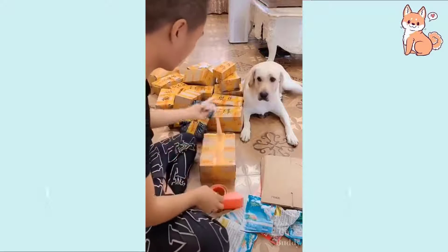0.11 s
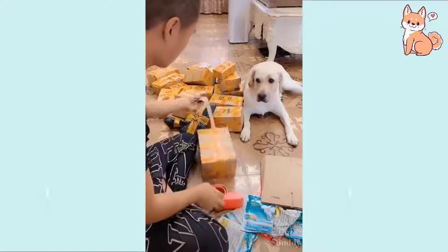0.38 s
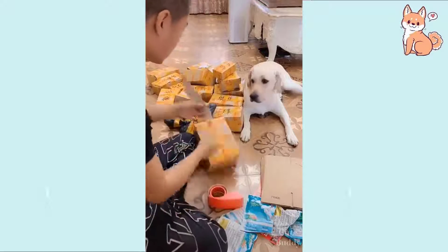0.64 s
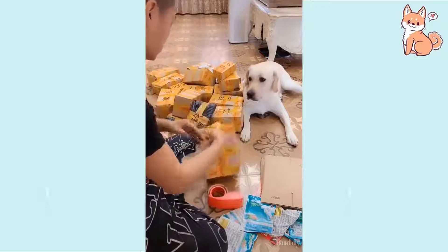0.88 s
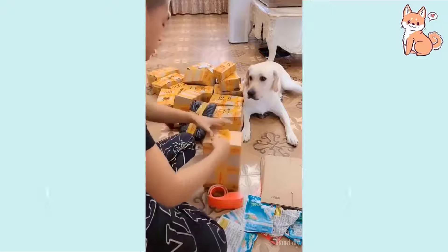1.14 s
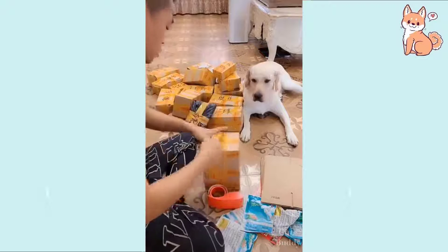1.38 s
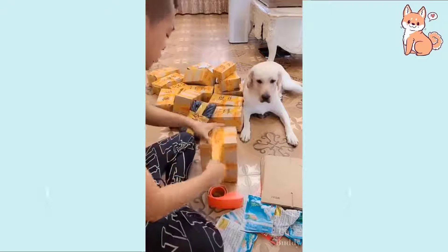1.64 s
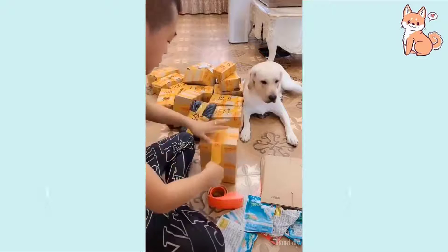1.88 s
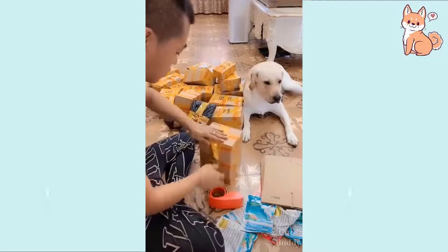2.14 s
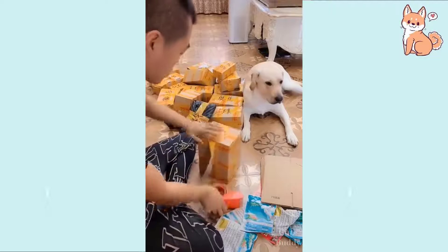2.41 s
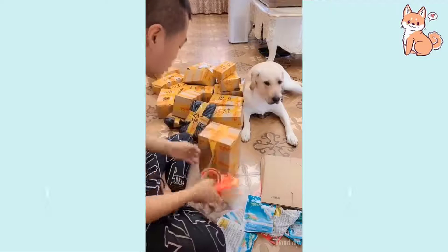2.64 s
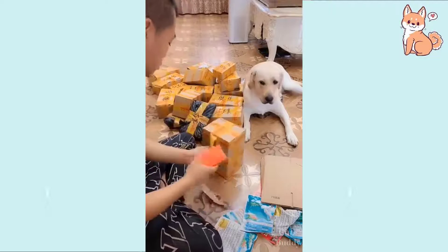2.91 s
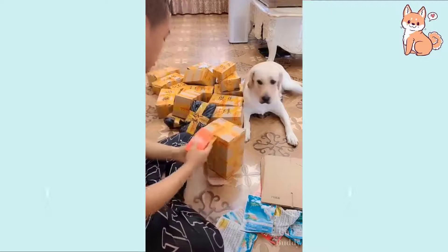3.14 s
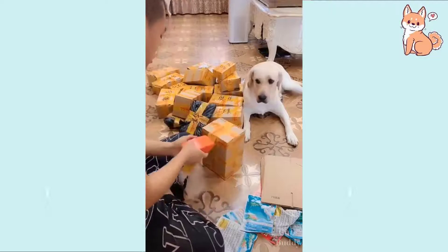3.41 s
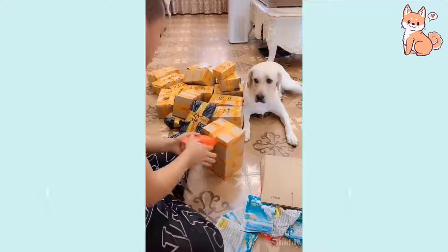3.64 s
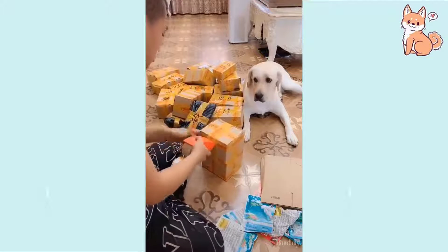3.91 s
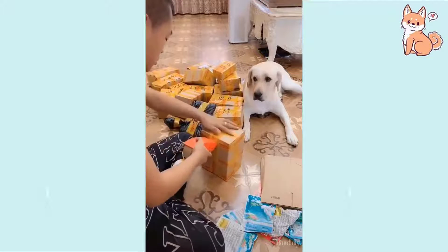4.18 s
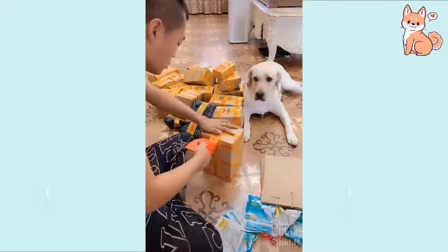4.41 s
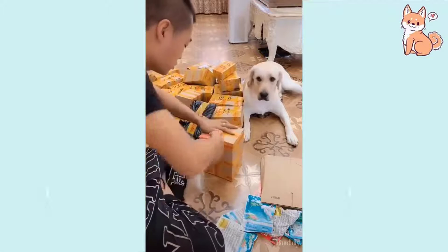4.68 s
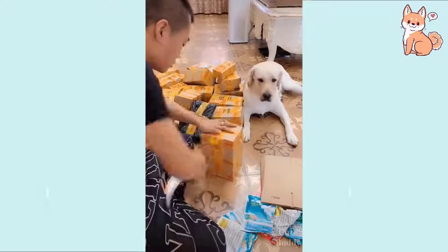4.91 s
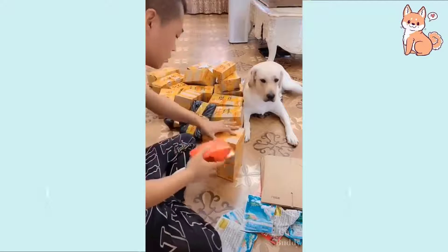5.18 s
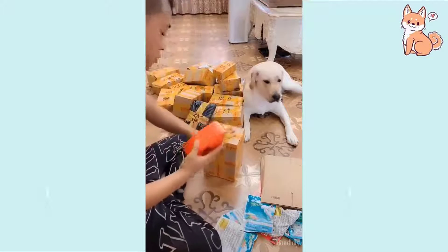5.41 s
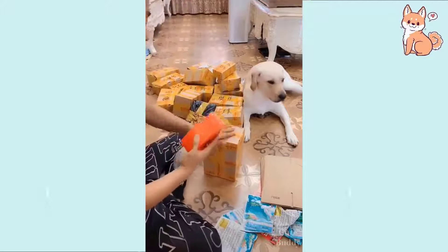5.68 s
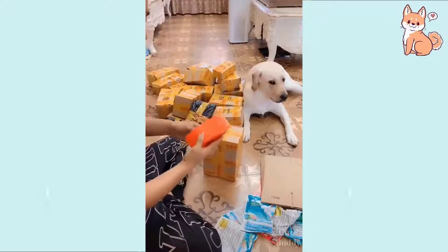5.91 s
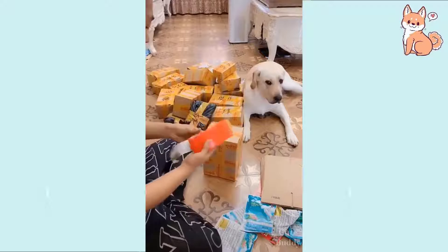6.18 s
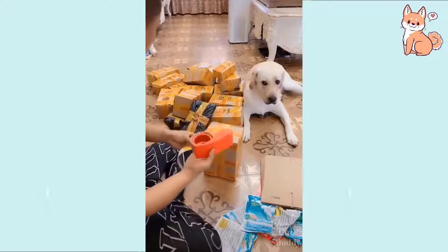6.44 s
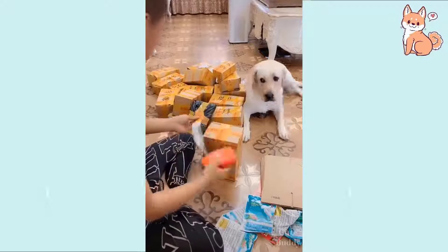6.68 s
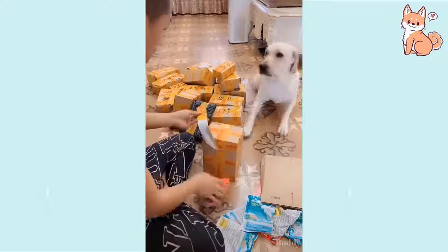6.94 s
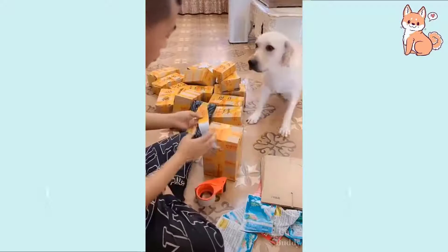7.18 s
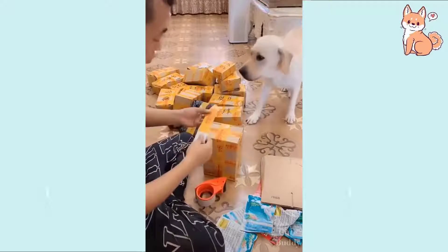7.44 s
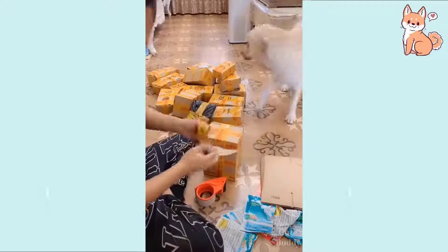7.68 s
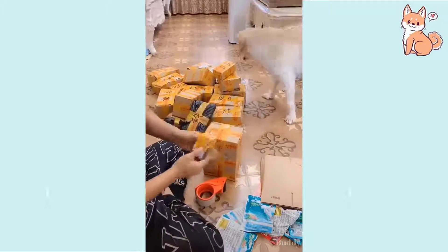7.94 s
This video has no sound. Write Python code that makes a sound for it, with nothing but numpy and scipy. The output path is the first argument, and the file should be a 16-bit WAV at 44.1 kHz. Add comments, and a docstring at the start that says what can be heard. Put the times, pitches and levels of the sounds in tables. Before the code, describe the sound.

Palms pat and knock a carton shut as a plastic tape dispenser clatters and short bursts of sticky tape snap, close up indoors.

```python
"""On a tiled floor indoors, cardboard boxes are taped shut by hand. Palms thump the hollow carton and the
plastic dispenser rattles, is slammed onto the box and is dropped: each blow rings a set of modes under a noisy
crack. Tape snaps as puffs of noise; ripping tape and rubbing hands are trains of tiny slips that shake carton
and dispenser. Film and sleeves rustle as clumps of short rings. The room answers with dying noise over a low
rumble. A phone flattens the loudest peaks."""
import sys
import numpy as np
from scipy import signal
from scipy.fft import rfft, irfft
from scipy.io import wavfile
from scipy.ndimage import uniform_filter1d

SR = 44100
rng = np.random.default_rng(int(sys.argv[2]) if len(sys.argv) > 2 else 0)


def inscribe(sig):
    """Save sig as 16-bit PCM at rate SR to the path in sys.argv[1].

    A 1-D sig is mono; a 2-D sig holds one channel per row.
    Samples are clipped to [-1, 1] before scaling.
    """
    pcm = np.round(np.clip(np.atleast_2d(sig).T, -1, 1) * 32767)
    wavfile.write(sys.argv[1], SR, pcm.astype(np.int16))


def elevation(decibels):
    """Turn decibel levels (scalar or array-like) into linear amplitude ratios."""
    levels = np.asarray(decibels, float)
    return 10 ** (levels / 20)


N = 355887   # length in samples
TIME = np.arange(N) / SR   # seconds


def rms_one(x):
    """Scales a sound to an rms of 1."""
    return x / np.sqrt(np.mean(x ** 2) + 1e-20)


def at_hz(points, hz):
    """Reads a curve of (Hz, value) points, with straight lines over log frequency."""
    points = np.array(points)
    return np.interp(np.log(hz + 1), np.log(points[:, 0]), points[:, 1])


def coloured(x, spectrum):
    """Boosts or cuts each frequency by a curve of (Hz, dB); rms 1."""
    size = x.shape[-1]
    gain = elevation(at_hz(spectrum, np.fft.rfftfreq(size, 1 / SR)))
    return rms_one(irfft(rfft(x) * gain, size))


def ring(x, hz, t60):
    """A resonance: a unit click sets a sine of height 1 ringing, 60 dB down after t60 seconds."""
    r, w = elevation(-60 / (t60 * SR)), 2 * np.pi * hz / SR
    return signal.lfilter([0, np.sin(w)], [1, -2 * r * np.cos(w), r * r], x + 1e-18)


def grains(per_s, spread_db, clump_db):
    """Random clicks of very uneven size, in clumps some 30 ms long; rms 1."""
    slow = signal.lfilter([1], [1, -2 * .997, .997 ** 2], rng.standard_normal(N))
    uneven_db = spread_db * np.minimum(rng.exponential(1, N), 4)
    sizes = elevation(uneven_db + clump_db * np.minimum(rms_one(slow), 2))
    clicks = rng.choice([-1, 1], N) * (rng.random(N) < per_s / SR)
    return rms_one(sizes * clicks)


def add(out, s, sound):
    """Mixes a sound in at s seconds, cut off at the end of the scene."""
    at = round(s * SR)
    out[at:at + len(sound)] += sound[:max(N - at, 0)]


def under(levels, layers):
    """Each layer follows its own dB column, with straight lines between the rows."""
    s, *levels_db = np.transpose(levels)
    return sum(layer * elevation(np.interp(TIME, s, db, left=-150, right=-150))
               for layer, db in zip(layers, levels_db))


HEAD_T60_S, TAIL_DB = 0.081, -3.5   # dying time of the first crack; start level of the crackle behind it
DENT_DB = 1   # depth of the chance resonances


def burst(size, t60, spectrum):
    """A short crack with chance resonances, then a plainer dying crackle; peak 1."""
    dents = [(hz, DENT_DB * np.tanh(chance))
             for hz, chance in zip(np.geomspace(300, 14000, 40), rng.standard_normal(40))]
    uneven = np.repeat(elevation(rng.normal(0, 1.93, size // 128)), 128)   # a new level every 3 ms
    crackle = coloured(rng.standard_normal(size) * uneven, spectrum)
    t = TIME[:size]
    head = coloured(crackle, dents) * elevation(-60 * t / HEAD_T60_S)
    puff = head + crackle * elevation(TAIL_DB - 60 * t / t60)
    return puff / np.abs(puff).max()


DETUNE = 0.016   # the grip shifts each mode a little, as a share of its pitch
CHATTER_DB, CHATTER_T60_S = -3.5, 0.19   # after a blow the loose parts touch again


def blows(events, modes, panel_t60, contact_s, crack, crack_t60):
    """The struck panel rings as a tight cluster and drives nearby modes; a crack and chatter join in."""
    out, t = np.zeros(N), TIME[:16384]
    swell = 1 - np.exp(-(t / contact_s) ** 2)   # the contact builds over a few ms
    for s, peak_db, struck_hz, octaves, crack_db in events:
        # the panel's own cluster is weaker for a broad blow
        panel = [(struck_hz * split, 5.0 - 11 * octaves, panel_t60) for split in (.96, 1, 1.05)]
        hz, level_db, t60 = np.array(modes + panel).T[:, :, None]
        hz = hz * (1 + DETUNE * rng.standard_normal(hz.shape))
        # modes far from the struck pitch get less, those below it less still
        near_db = -6 * np.abs(np.log2(hz / struck_hz)) / max(octaves, .1)
        near_db = near_db - 1.8 * np.maximum(np.log2(struck_hz / hz), 0)
        near_db = np.maximum(near_db, -26.0)   # a little reaches every mode
        phase = rng.normal(0, 0.82, hz.shape)
        # loose panels flutter
        rattle_db = 5.2 * signal.resample(rng.standard_normal((len(hz), 64)), len(t), axis=1)
        height = elevation(level_db + near_db + rattle_db - 60 * t / t60)
        body = swell * np.sum(height * np.sin(2 * np.pi * hz * t + phase), axis=0)
        body = elevation(peak_db) * body / np.abs(body).max()
        add(out, s, body + elevation(crack_db) * swell * burst(len(t), crack_t60, crack))
        touches_s = np.cumsum(rng.uniform(.006, 0.036, 8))
        for late_s, chance in zip(touches_s, rng.uniform(-1.2, 1, 8)):
            add(out, s + late_s, chance * elevation(CHATTER_DB - 60 * late_s / CHATTER_T60_S) * body)
    return out


# Palms hitting the carton; at 5.02 s the dispenser is slammed onto it. Each row: start in seconds, peak of the
# ringing in dB, pitch struck hardest # in Hz, spread over the modes in octaves, crack level in dB.
CARTON_THUMPS = [(0.177, -32.5, 318, 0.15, -52), (0.259, -39, 400, 0.18, -64),
                 (0.68, -27.5, 238, 0.42, -49), (0.867, -22.5, 245, 0.47, -28),
                 (0.982, -6.5, 412.4, 0.85, -17.5), (1.23, -25, 245, 0.24, -40),
                 (1.512, -19.5, 516, 0.44, -53), (2.05, -40, 470, 0.29, -62),
                 (2.145, -38.5, 417, 0.21, -62), (2.215, -24, 408, 0.45, -32),
                 (2.2245, -4, 334.6, 0.51, -14.5), (2.482, -26.5, 488, 0.4, -30),
                 (2.677, -30.5, 495, 0.15, -38), (2.708, -29.5, 228, 0.35, -35),
                 (2.974, -23.5, 205, 0.92, -29), (3.479, -34, 433, 0.19, -32.5),
                 (3.809, -12, 469, 0.55, -27.5), (4.174, -35, 440, 1.2, -32),
                 (4.205, -24.5, 446, 0.61, -35), (4.325, -18.5, 527, 0.31, -58),
                 (4.431, -19.5, 292, 0.5, -29), (4.976, -34, 693, 0.33, -35.5), (5.02, -4, 477, 0.43, -21),
                 (5.306, -39, 375, 0.45, -69), (5.345, -32.5, 443, 0.34, -67),
                 (5.934, -36.5, 442, 0.41, -60), (6.008, -31, 167, 0.56, -65)]
# Ways the hollow carton rings. Each row: pitch in Hz, relative level in dB, dying time when struck in
# seconds (to 60 dB down).
CARTON_MODES = [(77.7, 14.5, 0.19), (168.3, -2.5, 0.38), (205, 17.5, 0.025), (245, -4, 0.17),
                (305.7, -1, 0.17), (414.3, 3.5, 0.17), (471.2, 4, 0.11), (595, -11.5, 0.068),
                (903, -3, 0.22), (1100, 17.5, 0.029), (1592, 17.5, 0.042)]
# Colour of the carton's crack. Each row: frequency in Hz, relative level in dB.
CARTON_CRACK = [(150, -38), (700, 24), (1600, 19), (3000, 8.5), (6000, -2), (13000, -16)]


def carton_thumps():
    """A palm, or the slammed dispenser, sets the hollow box ringing low, with a dense crack of cardboard on
    top."""
    return blows(CARTON_THUMPS, CARTON_MODES, 0.15, 0.0012, CARTON_CRACK, 0.3)


# Harder knocks of the dispenser. Each row: start in seconds, peak of the ringing in dB, pitch struck
# hardest in Hz, spread over the modes in octaves, crack level in dB.
DISPENSER_KNOCKS = [(0.011, -4, 708, 0.66, -12), (2.599, -15.5, 740, 2.8, -36),
                    (3.403, -29, 1740, 0.27, -29.5), (3.439, -32, 1186, 0.18, -38),
                    (3.454, -26, 1750, 0.31, -31), (3.495, -28, 1176, 0.33, -24.5),
                    (3.522, -18, 1540, 0.52, -22.5), (3.572, -29, 1666, 0.35, -30.5),
                    (5.019, -11.5, 1460, 0.51, -10), (5.142, -23, 3000, 1.5, -26),
                    (5.589, -34, 1850, 0.56, -36), (6.214, -26, 1368, 0.42, -33),
                    (6.895, -29, 1626, 0.58, -29), (7.038, -36, 496, 1.4, -36),
                    (7.0815, -6.5, 1750, 1.56, -6), (7.2565, -3, 1297, 2.9, -7),
                    (7.339, -15.5, 1750, 1.2, -30)]
# Light ticks of its loose parts. Each row: start in seconds, peak of the ringing in dB, pitch struck
# hardest in Hz.
DISPENSER_TICKS = [(2.52, -31, 1450), (2.713, -41.5, 1750), (2.839, -42, 1570), (3.116, -35, 1460),
                   (3.31, -31.5, 2055), (3.705, -36, 1390), (3.89, -41, 3250), (3.961, -34, 1300),
                   (4.678, -38, 1345), (5.493, -42, 1415), (6.415, -40.5, 1130), (6.608, -37.5, 1430),
                   (6.705, -36.5, 1480), (6.83, -34, 1680), (7.48, -34, 1000)]
TICK_OCTAVES, TICK_CRACK_DB = 0.47, -5.5   # spread over the modes; crack against the ringing
# Ways the hard plastic rings. Each row: pitch in Hz, relative level in dB, dying time when struck in
# seconds (to 60 dB down).
DISPENSER_MODES = [(564, 5, 0.05), (705, 6, 0.026), (924.5, -5.5, 0.084), (1186, 5, 0.038),
                   (1257.5, -1.5, 0.049), (1465, -3.5, 0.07), (1613, -9.5, 0.15), (1750, -5.5, 0.069),
                   (1901, -7.5, 0.094), (2097, -9, 0.089), (2620, -9, 0.01), (3044, -0.5, 0.029),
                   (4080, -13, 0.04)]
# Colour of the dispenser's clatter. Each row: frequency in Hz, relative level in dB.
DISPENSER_CRACK = [(150, -29), (900, -32), (2500, -12.5), (4000, -16.5), (6500, -19.5), (13000, -33.5)]


def dispenser_knocks():
    """Small stiff plastic rings higher and dies sooner than the box."""
    ticks = [(s, db, hz, TICK_OCTAVES, db + TICK_CRACK_DB) for s, db, hz in DISPENSER_TICKS]
    return blows(DISPENSER_KNOCKS + ticks, DISPENSER_MODES, 0.053, 0.0023, DISPENSER_CRACK, 0.2)


# Sticky tape letting go in single snaps; the last row, at 8.05 s, is a light knock of the dispenser heard as a
# bright puff. Each row: start in seconds, peak in dB, centre pitch in Hz.
TAPE_SNAPS = [(0.343, -38, 3420), (0.357, -28, 4900), (1.392, -40.5, 5700), (2.004, -35, 3250),
              (2.101, -36.5, 3300), (2.359, -35, 3100), (3.184, -41, 4840), (3.227, -32, 3570),
              (3.972, -39.5, 6900), (4.22, -39.5, 7460), (4.8835, -44.5, 5840), (4.913, -39.5, 2620),
              (7.502, -34.5, 3080), (7.548, -27, 3550), (7.946, -25.5, 3300), (8.053, -27.5, 2960)]


def tape_snaps():
    """Each snap is a puff of noise around a broad resonance of the stretched film."""
    out = np.zeros(N)
    for s, peak_db, hz in TAPE_SNAPS:
        film = [(hz / 4, -13), (hz, 0), (hz * 4, -20)]
        add(out, s, elevation(peak_db) * burst(4096, 0.32, film))
    return out


def shaken(slips):
    """Stick-slip grains shake the carton into a drone and the dispenser into a buzz; rms 1 each."""
    # a held thing is damped, so its modes die sooner than when struck
    drone = sum(elevation(db) * ring(slips, hz, 0.75 * t60) for hz, db, t60 in CARTON_MODES[2:8])
    buzz = sum(elevation(db) * ring(slips, hz, 0.15 * t60) for hz, db, t60 in DISPENSER_MODES[2:11])
    return rms_one(np.gradient(drone)), rms_one(buzz)


RIP_ATTACK_S, RIP_FADE_DB_PER_S = 0.0088, 228


def pull(start_s, held_s):
    """A pull bites quickly, holds, then fades at a steady rate."""
    t = TIME - start_s
    return np.clip(t / RIP_ATTACK_S, 0, 1) * elevation(-RIP_FADE_DB_PER_S * np.clip(t - held_s, 0, 1))


# Tape peeling off the roll, or things skidding over carton and tiles. Each row: start in seconds,
# seconds until it fades, hiss in dB, carton drone in dB, dispenser buzz in dB.
RIPS = [(0.0, 0.007, -27.5, -50, -49), (1.49, 0.013, -35, -41, -50), (1.579, 0.048, -29.5, -27, -38.5),
        (2.596, 0.066, -62, -43, -38), (3.505, 0.03, -43.5, -47, -43), (5.028, 0.077, -39, -60, -37),
        (5.597, 0.023, -58, -36.5, -51), (5.645, 0.076, -56.5, -40.5, -49.5),
        (7.087, 0.067, -37, -39, -30.5), (7.265, 0.069, -45, -68, -36)]
# Colour of the peeling hiss. Each row: frequency in Hz, relative level in dB.
HISS_COLOUR = [(880, -34), (1800, -3), (3500, -7), (6500, -4), (9260, -6.5), (10300, -15), (12800, -13.5),
               (13500, -31)]


def tape_rips():
    """Peeling tape slips in tiny jerks that hiss and shake what it is stretched between."""
    slips = grains(5400, 1.5, 2.3)
    layers = np.array([coloured(slips, HISS_COLOUR), *shaken(slips)])
    return sum(pull(s, held_s) * (elevation(np.array(levels_db)) @ layers)
               for s, held_s, *levels_db in RIPS)


GRIP_PER_S, GRIP_SWING_DB = 48, 5   # fingers shift their hold at random


def grip():
    """Each shift of the fingers is a quick swell that dies away; a gain around 1."""
    shifts = (rng.random(N) < GRIP_PER_S / SR) * rng.exponential(1, N)
    r = elevation(-60 / (.2 * SR))   # 60 dB down in 0.2 s
    swell = uniform_filter1d(signal.lfilter([1], [1, -r], shifts), 200)
    return rms_one(elevation(GRIP_SWING_DB * np.minimum(rms_one(swell), 3)))


# Hands sliding and gripping. Each row: time in seconds, carton drone in dB, dispenser buzz in dB.
HANDLING = [(0.0, -46, -24), (0.47, -53, -99), (1.05, -55, -83), (1.95, -54.5, -63), (2.45, -52.5, -57),
            (2.9, -60, -58), (3.75, -54, -54.5), (4.4, -46.5, -61), (4.8, -63, -62.5), (5.3, -49, -71),
            (5.95, -54, -68), (6.35, -61, -62.5), (7.05, -68.5, -54.5), (8.07, -59.5, -65)]


def handling(hold):
    """Skin sticks and slips, harder when the fingers shift, and shakes carton and dispenser."""
    return under(HANDLING, shaken(hold * grains(3000, 2.4, 1.1)))


# Loudness of the rustling film and sleeves. Each row: time in seconds, level in dB.
RUSTLE = [(0.0, -42), (0.22, -45.5), (0.5, -77), (0.83, -62), (1.1, -56), (1.85, -54.5), (2.88, -65.5),
          (3.3, -60), (4.45, -60.5), (4.82, -69), (5.4, -57.5), (5.98, -66), (6.2, -59.5), (6.9, -61),
          (7.6, -54.5), (8.07, -58.5)]
# Tone of the rustle. Each row: frequency in Hz, boost or cut in dB.
RUSTLE_COLOUR = [(900, -22), (2500, -9.5), (5000, -5), (9000, -4), (13000, -21)]


def rustle(hold):
    """Crinkles at many pitches, each band clumping in its own time, swelling with the grip."""
    crinkles = sum(rms_one(ring(grains(400, 0.89, 7.5), hz, 2.0 / hz)) / np.sqrt(hz)
                   for hz in np.geomspace(1200, 12500, 10))
    return np.sqrt(hold) * under(RUSTLE, [coloured(crinkles, RUSTLE_COLOUR)])


# How long the echoes last. Each row: frequency in Hz, time to fall 60 dB in seconds.
ROOM_T60 = [(150, 0.52), (500, 0.29), (1500, 0.38), (4000, 0.41), (10000, 0.25)]
ROOM_DB, FIRST_ECHO_S = -7.5, 0.015   # level of the centre echoes; time over which they build


def room(x):
    """Dense echoes: noise dying band by band, a centre and a side tail."""
    t, tail = TIME[:SR], 0   # one second of echoes
    edges = 100 * 2 ** np.arange(0, 7.6, .5)   # half-octave bands
    white = rng.standard_normal((2, len(t)))
    for low, high in zip(edges, edges[1:]):
        band = signal.sosfilt(signal.butter(2, [low, high], "band", fs=SR, output="sos"), white)
        tail = tail + band * elevation(-60 * t / at_hz(ROOM_T60, np.sqrt(low * high)))
    tail[0] *= 1 - np.exp(-(t / FIRST_ECHO_S) ** 2)
    tail = tail / np.sqrt(np.sum(tail ** 2, axis=1, keepdims=True))
    return signal.fftconvolve(x[None], tail, axes=1)[:, :N]


# Colour of the low rumble. Each row: frequency in Hz, relative level in dB.
RUMBLE_COLOUR = [(13, -41), (31, -6), (45, 8), (62, 10.5), (120, -19.5), (411, -14.5), (667, -34),
                 (1570, -28), (4000, -43), (8320, -46), (13500, -38.5)]


def rumble():
    """Steady noise, strongest in the bass, drawn separately for centre and side."""
    return elevation(-49.5) * coloured(rng.standard_normal((2, N)), RUMBLE_COLOUR)


WIDE_HZ, WIDE_DB = 3780, -6.5   # only the treble differs between the channels


def scene():
    """All sources share the room; the side signal lives in the treble."""
    hold = grip()
    near = carton_thumps() + dispenser_knocks() + tape_snaps()
    near = near + tape_rips() + handling(hold) + rustle(hold)
    echoes, still = room(near), rumble()
    mid = near + elevation(ROOM_DB) * echoes[0] + still[0]
    wide = signal.cheby2(8, 40, WIDE_HZ, "high", fs=SR, output="sos")
    side_echoes = signal.lfilter([1, -.4], [1], echoes[1])   # thinned in the bass
    side = signal.sosfilt(wide, elevation(WIDE_DB) * (side_echoes + still[1]))
    return np.array([mid + side, mid - side])


def band_limit(x):
    """A steep low-pass at the top of the band."""
    return signal.sosfilt(signal.butter(12, 13650, fs=SR, output="sos"), x)


CUTOFF_HZ, TOP = 14100, .56   # treble is gone above this; ceiling that the peaks bend toward


def record(dry):
    """A phone flattens the loudest peaks smoothly, then the top of the treble is cut."""
    flattened = dry / (1 + (dry / TOP) ** 4) ** (1 / 4)
    cut = signal.cheby2(10, 45, CUTOFF_HZ, fs=SR, output="sos")
    return band_limit(signal.sosfilt(cut, flattened))


dry = scene()
out = record(dry)
inscribe(out)
```